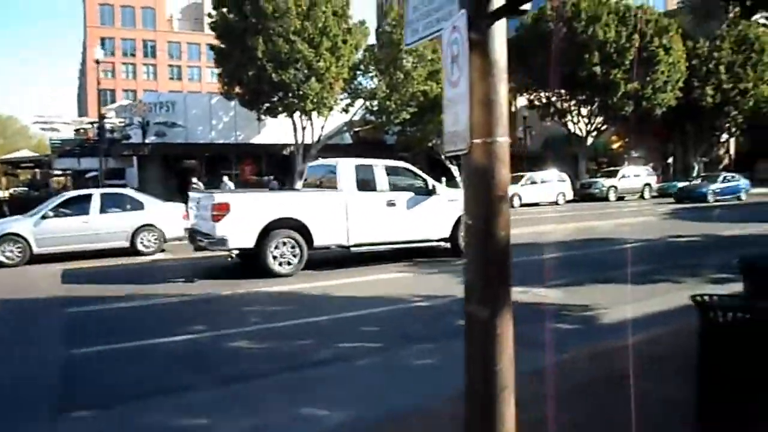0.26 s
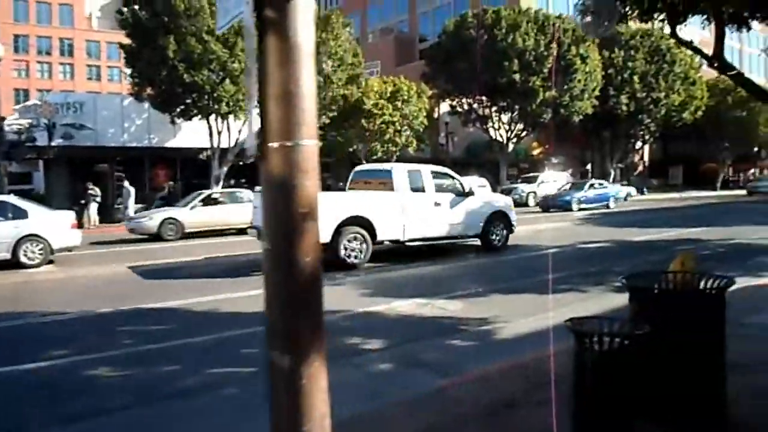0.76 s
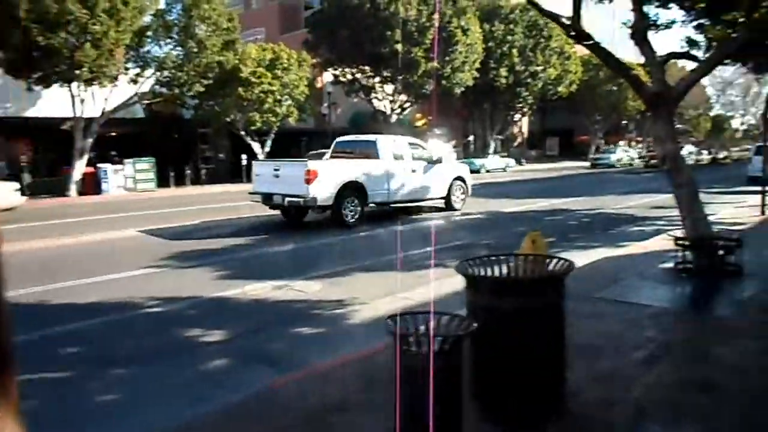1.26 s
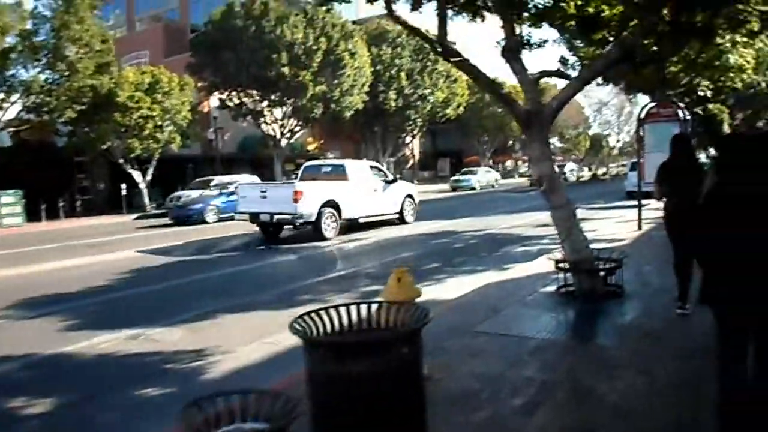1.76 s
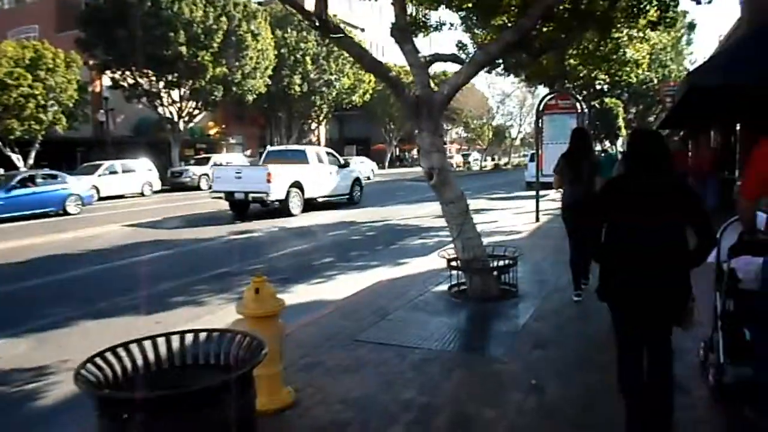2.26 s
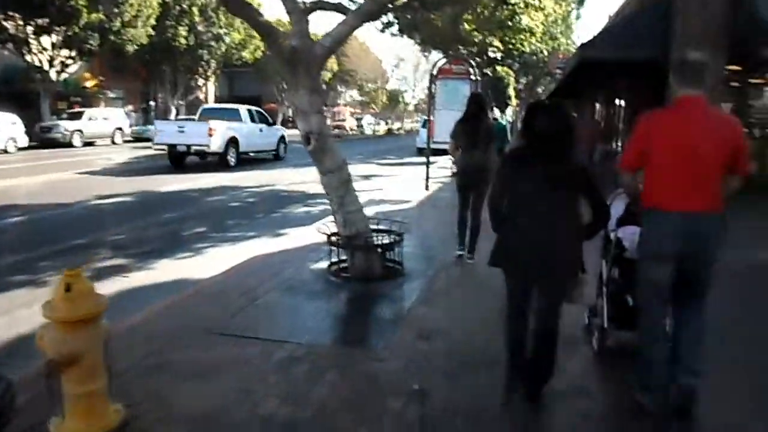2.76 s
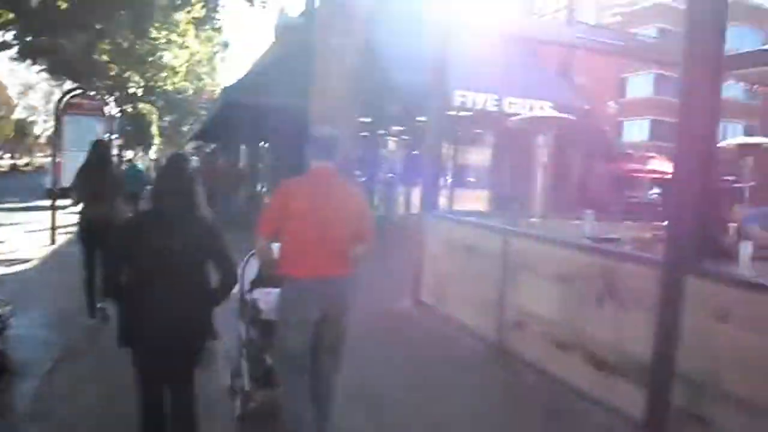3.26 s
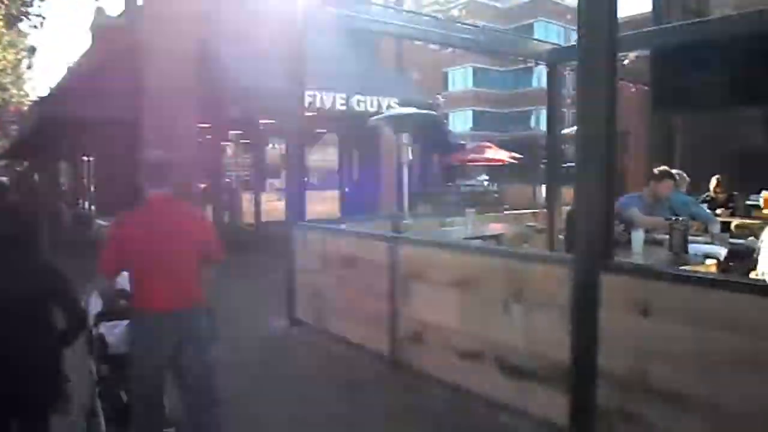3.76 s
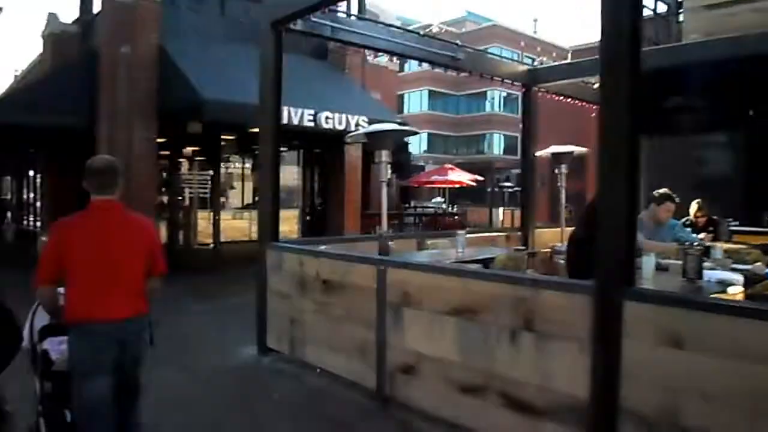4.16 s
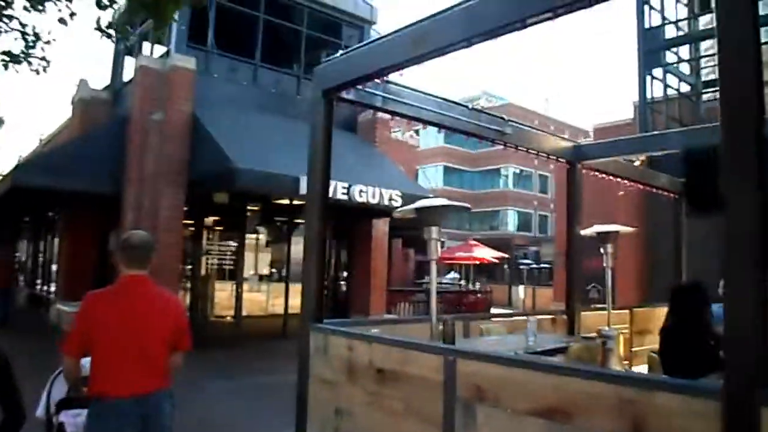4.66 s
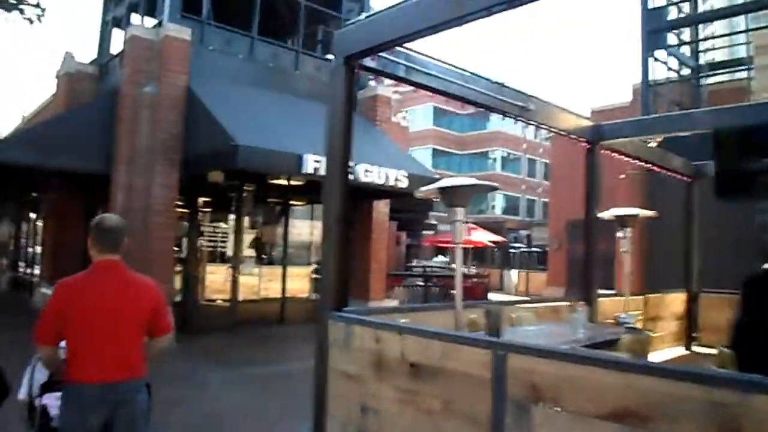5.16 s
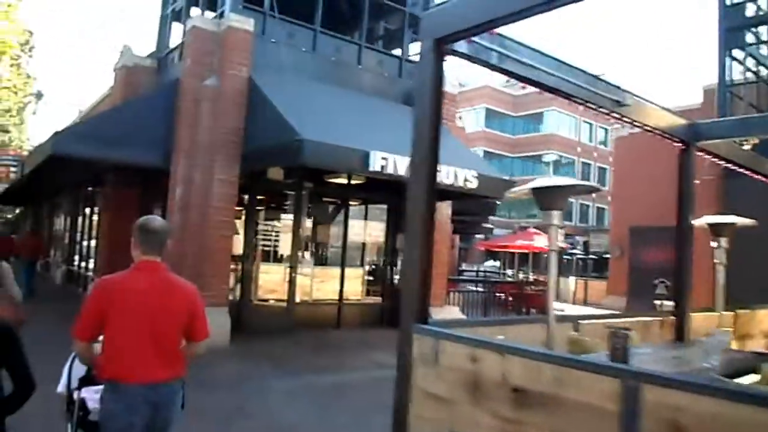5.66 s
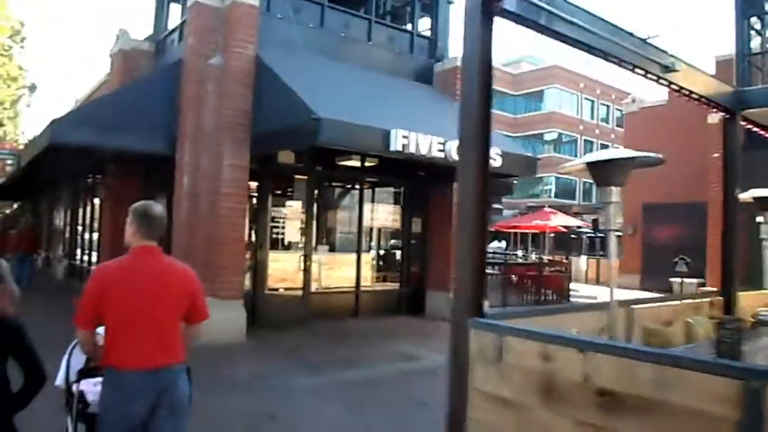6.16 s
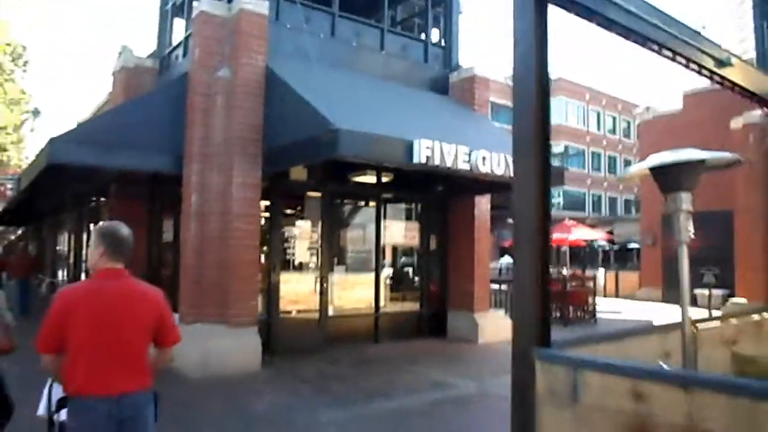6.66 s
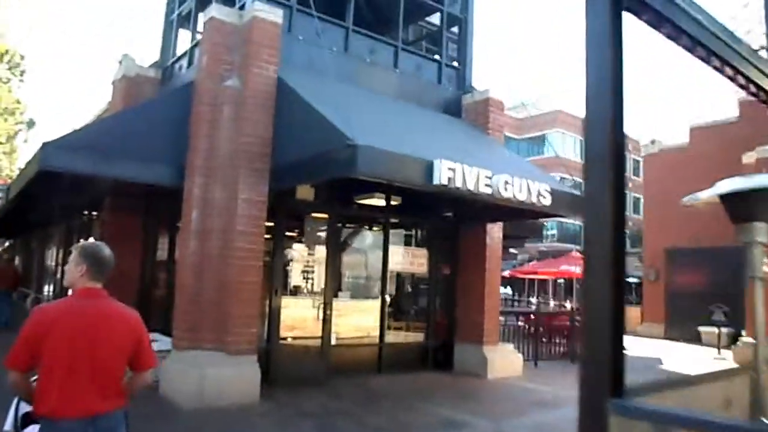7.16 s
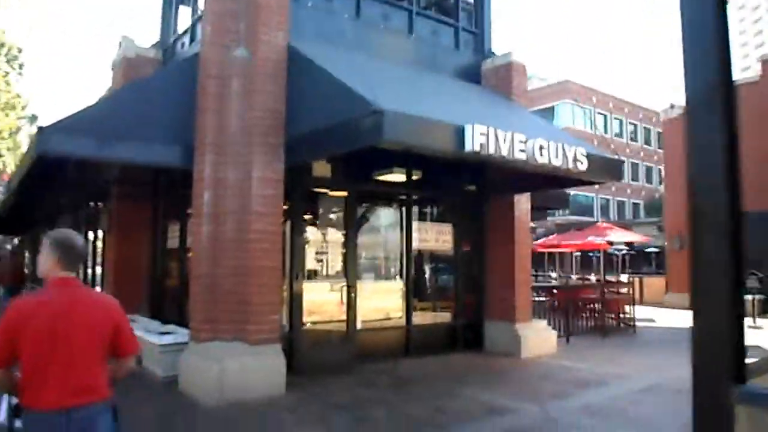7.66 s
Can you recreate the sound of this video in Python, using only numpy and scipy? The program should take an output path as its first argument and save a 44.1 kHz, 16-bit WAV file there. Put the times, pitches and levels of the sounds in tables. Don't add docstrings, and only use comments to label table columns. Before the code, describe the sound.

A handheld camera carried along a busy road: heavy low rumble, overloading bumps that briefly duck the sound, later sharp case ticks and knocks.

```python
import sys
import numpy as np
from scipy import signal
from scipy.io import wavfile
from scipy.ndimage import uniform_filter1d

SR = 44100
rng = np.random.default_rng(int(sys.argv[2]) if len(sys.argv) > 2 else 0)


def gain_from_db(level_db):
    decades = np.asarray(level_db, float) / 20
    return 10 ** decades


def generate_wav(signal):
    frames = np.transpose(np.atleast_2d(signal))
    scaled = np.clip(frames, -1, 1) * 32767
    pcm = np.round(scaled).astype(np.int16)
    wavfile.write(sys.argv[1], SR, pcm)


N = 348831
HZ, FRAME_S = np.fft.rfftfreq(2048, 1 / SR), np.arange(N // 512 + 5) * 512 / SR


def evened(x):
    return x / np.sqrt(np.mean(x ** 2) + 1e-20)


def peaked(x):
    return x / abs(x).max()


def read(points, hz):
    f, value = np.transpose(points)
    return np.interp(np.log(hz + 1), np.log(f + 1), value)


def add(mix, start_s, sound):
    part = mix[round(start_s * SR):][:len(sound)]
    part += sound[:len(part)]


def resonate(x, hz, width_hz):
    turn = np.exp(2j * np.pi * np.cumsum(hz * np.ones(len(x))) / SR)
    pole = np.exp(-np.pi * width_hz / SR)
    smooth = signal.lfilter([1 - pole], [1, -pole], x / turn + 1e-18)
    return 2 * (turn * smooth).real


def resonate_twice(x, hz, width_hz):
    return resonate(resonate(x, hz, width_hz), hz, width_hz)


def steep(x, hz, width_hz):
    return resonate(resonate_twice(x, hz, width_hz), hz, width_hz)


def slow(top_hz):
    rates_hz = np.geomspace(.3, top_hz, num=16)
    return evened(sum(np.sin(2 * np.pi * (f * FRAME_S + rng.random())) / np.sqrt(f) for f in rates_hz))


def noise(field_db, patchy_db):
    a, b, patches = rng.standard_normal((field_db.shape[1], 1025, 3)).T
    gusts = evened(uniform_filter1d(uniform_filter1d(patches, size=120, axis=0), size=3, axis=1))
    patches = evened(uniform_filter1d(uniform_filter1d(patches, size=14, axis=0), size=8, axis=1))
    patches = patches + 0.63 * gusts
    spectra = (a + 1j * b) * gain_from_db(field_db + patchy_db * patches)
    return signal.istft(spectra, nperseg=2048, noverlap=1536)[1][:N]


def note(row, width_hz, clean, edge, waver_hz=0):
    start_s, length_s, from_hz, to_hz, level_db = row
    size = round(length_s * SR)
    waver = waver_hz * np.cos(2 * np.pi * 23 * np.arange(size) / SR)
    hz = np.linspace(from_hz, to_hz, size) + waver
    blur = evened(resonate_twice(rng.standard_normal(2 * SR)[:size], hz, width_hz))
    tone = np.sqrt(2) * np.sin(2 * np.pi * np.cumsum(hz) / SR)
    swell = signal.windows.tukey(size, np.clip(edge, 0, 1))
    return start_s, gain_from_db(level_db) * (clean * tone + (1 - clean) * blur) * swell


# start_s, quick_db, slow_db
GAIN_DROPS = [
    (2.225, 0, 9),
    (2.461, -1.5, 5.5),
    (2.875, -1.2, 3),
    (3.33, -0.7, 0.6),
]
REST_DB, DRIFT_DB_PER_S = -.5, 0.2021
GRAB_S, QUICK_S, SLOW_S = 0.014, 0.65, 1.145


def gain():
    t = np.arange(0, N + 64, 64) / SR
    db = REST_DB + DRIFT_DB_PER_S * t
    for start_s, quick_db, slow_db in GAIN_DROPS:
        u = np.maximum(t - start_s, 0)
        drop_db = quick_db * np.exp(-u / QUICK_S) + slow_db * np.exp(-u / SLOW_S)
        db = db - np.minimum(u / GRAB_S, 1) * drop_db
    return gain_from_db(np.interp(np.arange(N) / SR, t, db))


# freq_hz, density_db
ROAD_COLOUR = [(8.8, -54), (15, -4), (37, 2.5), (78, -5.5), (128, -15.5), (180, -24), (232, -21),
               (291, -29.5), (392, -33.5), (459, -36.5), (777, -41.5), (1230, -47.5), (1390, -49),
               (1460, -54.5), (1950, -57.5), (3500, -69), (4550, -73), (7700, -120)]
# freq_hz, density_db
WALL_COLOUR = [(8.8, -43), (15, 1.5), (37, 0), (95, -5.5), (140, -8.5), (216, -15), (349, -24),
               (449, -24.5), (1090, -30.5), (3500, -58.5), (4550, -63), (7700, -120)]
# time_s, wall_share (0-1), traffic_db
WALK_PATH = [
    (0, 0.24, 2),
    (.6, 0.1, 4.5),
    (1.2, 0, 8),
    (2.2, 0, 6),
    (3.2, 0.48, 2),
    (4, 0.53, 4),
    (5.2, 0.85, 1),
    (6.2, 0.71, 3),
    (7.1, 0.86, 2),
    (7.91, 0.78, 1),
]
ROAD_DB, WALL_DB = -21.5, -18.5
RUMBLE_DB, RUMBLE_TO_WALL_DB, RUMBLE_SWELL_DB, ROAR_SWELL_DB = 3, -2.5, 0.2, .5


def traffic():
    time_s, *columns = np.transpose(WALK_PATH)
    wall, level_db = (np.interp(FRAME_S, time_s, c) for c in columns)
    wall = np.clip(wall, 0, 1)
    rumble_db = RUMBLE_DB + RUMBLE_TO_WALL_DB * wall + 0.26 * level_db + RUMBLE_SWELL_DB * slow(4.0)
    roar_db = level_db + ROAR_SWELL_DB * slow(3.5)
    road, patio = read(ROAD_COLOUR, HZ), read(WALL_COLOUR, HZ)
    road = road + ROAD_DB - 10 * np.log10(np.sum(gain_from_db(road) ** 2))
    patio = patio + WALL_DB - 10 * np.log10(np.sum(gain_from_db(patio) ** 2))
    low = 1 / (1 + (HZ / 110) ** 2)[:, None]
    colour = road[:, None] * (1 - wall) + patio[:, None] * wall
    field = colour + low * rumble_db + (1 - low) * roar_db
    return noise(field - 3.2, patchy_db=0.84)


# start_s, length_s, from_hz, to_hz, level_db
IDLE_NOTES = [
    (0, 0.71, 118.1, 126.6, -35.5),
    (.6, 0.38, 123, 121.4, -35.5),
    (0.999, 0.68, 121.8, 118.6, -32.5),
    (1.749, 0.63, 116.1, 113.4, -33.5),
    (3.302, 1, 117, 116.3, -34),
    (3.999, 0.95, 116.2, 115.6, -32),
    (4.6, 0.826, 116, 116.8, -30),
    (5.549, 0.62, 114.8, 115.9, -31.5),
    (6.197, 1, 117, 112.3, -39),
    (6.799, 0.97, 115.9, 116.7, -33.5),
]
# start_s, length_s, from_hz, to_hz, level_db
BUS_NOTES = [
    (0, .35, 36, 46, -19),
    (.55, .25, 41, 40.7, -22),
    (3.8, .3, 45, 50, -23),
    (4.45, .6, 39.6, 38.5, -24),
    (5.05, .58, 37, 39.8, -21),
    (5.77, .19, 39.5, 39.7, -15),
    (5.94, .22, 39.9, 40.3, -15),
    (6.5, .85, 38.6, 38.9, -23),
    (7.05, .3, 48, 52, -21),
    (7.5, .41, 40, 39.5, -23),
]
# start_s, length_s, from_hz, to_hz, level_db
CAR_NOTES = [
    (.45, .35, 100, 104, -29),
    (4.2, .5, 180, 182, -41),
    (4.3, .45, 92, 88, -29),
    (5.5, .25, 300, 340, -42),
    (5, 1.2, 178, 177, -41),
    (5.55, .4, 296, 298, -42),
    (6.12, .58, 84, 94, -23),
    (6.4, 1.1, 177, 176, -41),
    (6.65, .35, 97, 107, -26),
    (7.72, .3, 166, 167, -29),
]


def engines():
    out = np.zeros(N)
    for row in IDLE_NOTES:
        add(out, *note(row, 7, clean=.65, edge=.5))
    for row in BUS_NOTES:
        add(out, *note(row, 5.1, clean=.8, edge=.7))
    for row in CAR_NOTES:
        add(out, *note(row, 8, clean=.6, edge=.4))
    return out / gain()


# freq_hz, density_db
HISS_COLOUR = [(1470, -58), (2500, -4.5), (3460, -7.5), (3940, -10.5), (4670, -8), (7320, -9.5),
               (7900, -17), (8340, -10.5), (14400, -16.5), (15800, -14.5)]


def input_hiss():
    field = read(HISS_COLOUR, HZ)[:, None] + 0 * FRAME_S
    return gain_from_db(-65.5) * evened(noise(field, patchy_db=.3))


# freq_hz, level_db, swing_rad
CLOCK_LINES = [
    (3933.6, -69.5, .15),
    (7867.1, -73, .9),
    (14182.9, -78.5, .9),
    (11767.5, -83, 1.05),
    (10282, -86, .9),
    (15665, -87, .9),
]
FRAME_HZ, JITTER_DB = 14.985, -68


def sensor_clock():
    t = np.arange(N) / SR
    flip = np.tanh(12 * np.cos(2 * np.pi * FRAME_HZ * t))
    whine, jitter = np.zeros(N), np.zeros(N)
    for hz, level_db, swing_rad in CLOCK_LINES:
        fuzz = evened(resonate(rng.standard_normal(N), hz, 270))
        line = np.sqrt(2) * np.cos(2 * np.pi * hz * t + swing_rad * flip)
        whine += gain_from_db(level_db) * (line + gain_from_db(-2.5) * fuzz)
        jitter += gain_from_db(JITTER_DB) * (line + .4 * fuzz)
    return whine, jitter


# start_s, length_s, from_hz, to_hz, level_db
BRAKE_SQUEAKS = [
    (.168, .143, 5240, 5110, -69),
    (4.365, .146, 5150, 5170, -73),
]


def squeaks():
    out = np.zeros(N)
    for row in BRAKE_SQUEAKS:
        add(out, *note(row, 200, clean=.55, edge=.15, waver_hz=45))
    return out / gain()


# start_s, level_db, freq_hz,
# width_hz, t60_s
CLANKS_AND_KNOCKS = [(.27, -58, 1940, 70, .12), (.92, -59, 1910, 60, 0.089), (1.585, -58, 760, 90, 0.092),
                     (1.64, -54, 1930, 70, 0.089), (2.867, -35, 476, 180, 0.07), (2.885, -35.5, 300, 200, .1),
                     (3.435, -45, 900, 800, 0.022), (3.871, -36.5, 414, 180, 0.063),
                     (4.19, -41, 726, 200, 0.23), (4.215, -39, 648, 70, .2), (4.26, -37.5, 570, 70, 0.12),
                     (5.494, -34, 650, 400, 0.045), (5.599, -34, 790, 597, .04), (5.7, -46, 908, 830, 0.097),
                     (6.31, -37, 597, 300, 0.12), (7.377, -46, 1600, 1200, 0.046),
                     (7.38, -48, 2750, 800, 0.068), (7.402, -34, 1370, 900, .06),
                     (7.37, -62, 2580, 2400, 0.54), (7.422, -42, 1300, 900, 0.1),
                     (7.437, -52, 1800, 2200, 0.097), (7.63, -39, 583, 41.7, 0.6),
                     (6.712, -50, 11000, 9000, .045), (6.727, -54, 11000, 9000, .05),
                     (1.7995, -43, 1300, 1600, 0.03), (7.843, -41, 2500, 900, .03)]


def clanks():
    out, t = np.zeros(N), np.arange(9000) / SR
    grains = rng.standard_normal((len(CLANKS_AND_KNOCKS), 9000))
    for (start_s, level_db, hz, width_hz, t60_s), z in zip(CLANKS_AND_KNOCKS, grains):
        ring = evened(resonate_twice(z, hz, width_hz))
        pitch = np.sqrt(2) * np.sin(2 * np.pi * hz * t)
        ring = evened(ring + 60 / width_hz * pitch)
        attack = np.minimum(t / (0.045 * t60_s), 1)
        add(out, start_s, gain_from_db(level_db - 60 * t / t60_s) * attack * ring)
    return out / gain()


# start_s, bright_peak_db, side_db, side_hz, thud_db
CASE_TICKS = [(1.7995, -55, -54, 1900, -36), (1.802, -57, -42, 1500, -41), (2.533, -57, -53, 1800, -56),
              (3.1373, -59, -64, 1800, -63), (3.365, -39, -44, 1900, -68), (3.369, -50, -48, 2100, -60),
              (3.39, -58, -46, 2200, -47), (4.801, -36.5, -38, 1700, -52), (4.8042, -38, -36, 1880, -57),
              (4.855, -54, -44, 2200, -48), (5.099, -52, -42, 1800, -51), (5.5644, -26, -31.5, 2160, -61),
              (5.5679, -33, -35, 1800, -71), (5.573, -50, -44, 1950, -54), (5.651, -60, -36, 1750, -52),
              (5.652, -65, -41, 2400, -60), (5.6535, -62, -44, 2980, -55), (5.983, -53, -36, 4850, -60),
              (5.9884, -50, -37, 4850, -60), (5.9835, -23, -34, 2480, -44), (5.988, -31, -33, 2230, -43),
              (5.995, -45, -46, 3000, -55), (6.678, -29, -42, 2200, -52), (6.6785, -50, -41, 4850, -60),
              (6.682, -40, -44, 2000, -60), (6.68, -35, -38, 2000, -53), (6.7106, -21, -28, 2100, -51),
              (6.7135, -35, -34, 2600, -45), (6.7175, -34, -34, 2200, -48), (6.7155, -40, -43, 2400, -53),
              (6.72, -45, -35, 2000, -49), (6.7254, -24, -18, 1850, -32), (6.725, -24, -21, 3230, -42),
              (6.729, -25, -43, 2200, -43), (6.732, -47, -32, 1680, -31.5), (7.8431, -27, -34, 4670, -50),
              (7.844, -30, -32, 2800, -33.5), (7.8455, -29, -35, 4720, -45), (7.846, -44, -32, 3000, -56)]
# freq_hz, width_hz, level_db
CASE_MODES = [(4040, 670, 10), (4850, 710, -1), (2790, 390, 1), (5950, 7500, -11.5), (8440, 550, -10),
              (12400, 12000, -13)]
RATTLE_T60_S, SNAP_SHARE = 0.011, 0.42


def ticks():
    out, t = np.zeros(N), np.arange(2400) / SR
    snap = 12 * SNAP_SHARE * (np.arange(len(t)) == 20)
    grains = rng.standard_normal((len(CASE_TICKS), 2400))
    for (start_s, bright_db, side_db, side_hz, thud_db), z in zip(CASE_TICKS, grains):
        rattle = z * gain_from_db(-60 * t / RATTLE_T60_S) * np.minimum(t / 0.00034, 1)
        drive = (1 - SNAP_SHARE) * rattle + snap
        bright = np.zeros(len(t))
        for k, (hz, width_hz, mode_db) in enumerate(CASE_MODES):
            mode = resonate_twice(drive, hz, width_hz) / np.sqrt(width_hz)
            bright += (-1) ** k * gain_from_db(mode_db) * mode
        side = steep(drive, side_hz, 1020)
        thud = steep(drive, 580, 1100)
        tick = gain_from_db(bright_db - 1.5) * peaked(bright) + gain_from_db(side_db - 1.0) * peaked(side)
        add(out, start_s, tick + gain_from_db(thud_db + 9.5) * peaked(thud))
    return out


# pull_s, push_height, push_width_s, pull_height, pull_width_s
HAND_JOLTS = [
    (2.228, .97, .0068, 1.6, .0087),
    (2.3755, .17, .0087, .37, .0088),
    (2.4583, .63, .0094, 1.12, .0057),
    (2.4701, -.23, .0071, .6, .0047),
    (2.5612, .24, .0088, .27, .0114),
    (2.8749, .9, .005, 1.0, .0066),
    (3.33, .48, .0043, .64, .0054),
    (3.4491, .16, .005, .14, .0128),
]
# crest_s, height, rise_s
SWING_BACKS = [
    (2.2633, .4, .007),
    (2.41, .055, .01),
    (2.4878, .2, .0054),
    (2.505, .21, .0052),
    (2.6016, .09, .0059),
    (2.9148, .17, .009),
    (3.3602, .2, .0042),
    (3.4643, .14, .0051),
]
# crest_s, height, freq_hz, width_s
GRIP_TREMORS = [
    (2.449, 0.087, 164, 0.0051),
    (2.871, .07, 181, 0.0046),
]
PUSH_LEAD = 2.345


def jolts():
    t, out = np.arange(N) / SR, np.zeros(N)
    for (pull_at_s, push, push_s, pull, pull_s), (back_at_s, back, back_s) in zip(HAND_JOLTS, SWING_BACKS):
        u = t[round((pull_at_s - .08) * SR):round((pull_at_s + .2) * SR)] - pull_at_s
        fall = u / np.where(u < 0, .537 * pull_s, 1.5 * pull_s)
        since_back = u + pull_at_s - back_at_s
        late = since_back / np.where(since_back < 0, back_s, 2.05 * back_s)
        shape = push * np.exp(-(u / push_s + PUSH_LEAD) ** 2 / 2)
        shape = shape - pull * np.exp(-abs(fall) ** 1.59 * .63)
        add(out, pull_at_s - .08, shape + back * np.exp(-late ** 2 / 2))
    for crest_s, height, hz, width_s in GRIP_TREMORS:
        u = t - crest_s
        out += height * np.cos(2 * np.pi * hz * u) * np.exp(-(u / width_s) ** 2 / 2)
    shudder = evened(resonate(resonate(rng.standard_normal(N), 160, 200), 180, 250))
    return out + gain_from_db(16.5) * shudder * uniform_filter1d(abs(np.gradient(out)), size=600)


CLIP_UP, CLIP_DOWN, FIZZ_DB = .83, .915, -39.5


def overload(x):
    flat = np.clip(x, -CLIP_DOWN, CLIP_UP)
    excess = abs(x - flat)
    crackle = evened(resonate(rng.standard_normal(N), 1900, 3600))
    holding = np.gradient(uniform_filter1d(abs(x[0]), size=60)) > -4e-4
    touching = (flat != x) & ((excess > .1) | holding)
    return flat + gain_from_db(FIZZ_DB) * crackle * uniform_filter1d(touching / (1 + 2.5 * excess), size=40)


def scene():
    fade = np.minimum(np.arange(N) / (.004 * SR) + .2, 1)
    return (fade * (traffic() + engines() + squeaks() + clanks()))[None]


def low_pass(x):
    return signal.sosfilt(signal.butter(12, 15990, fs=SR, output="sos"), x)


def record(dry):
    hiss = input_hiss()
    whine, jitter = sensor_clock()
    shake = jolts()
    strain = 220 * abs(uniform_filter1d(np.gradient(shake), size=150))
    x = (dry + hiss) * gain() + whine * gain() ** 1.5
    x = overload(x + strain * jitter + shake + ticks())
    x = signal.oaconvolve(x, signal.firwin(767, 15800, fs=SR)[None], "same")
    droop = signal.butter(1, .9, "high", fs=SR)
    return low_pass(signal.lfilter(*droop, x))


dry = scene()
out = record(dry)
generate_wav(out)
```